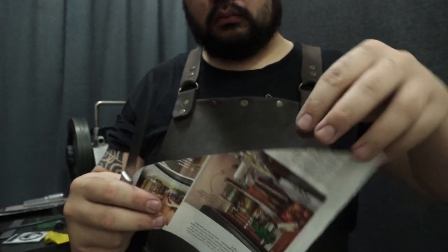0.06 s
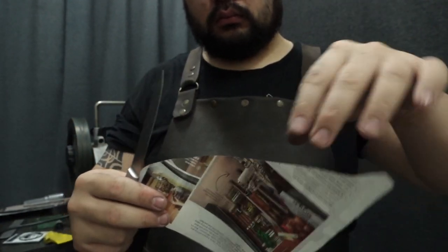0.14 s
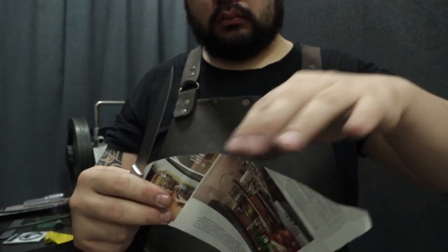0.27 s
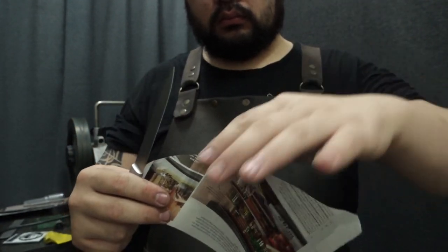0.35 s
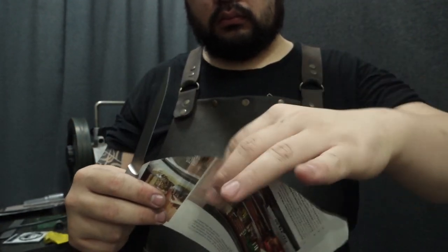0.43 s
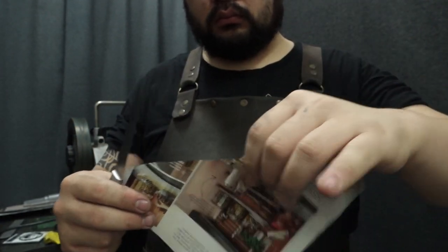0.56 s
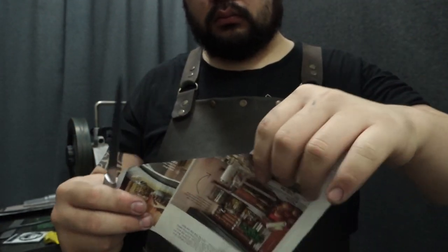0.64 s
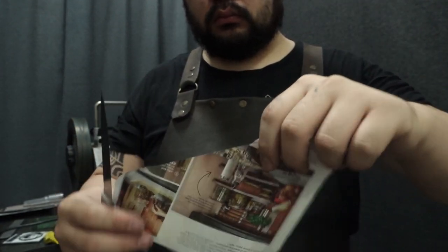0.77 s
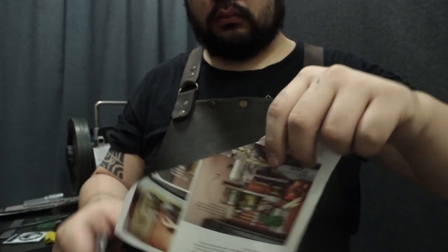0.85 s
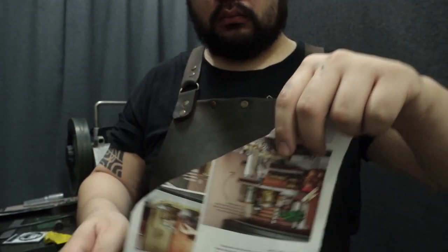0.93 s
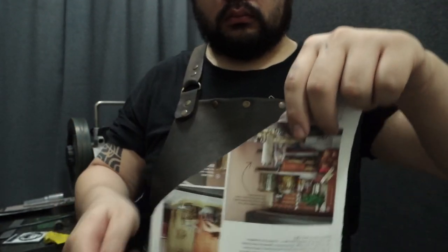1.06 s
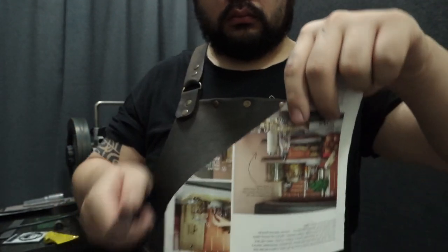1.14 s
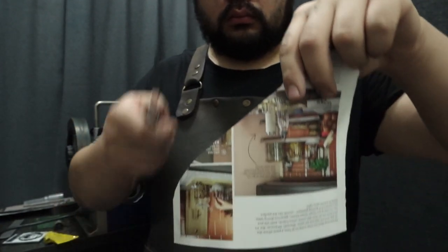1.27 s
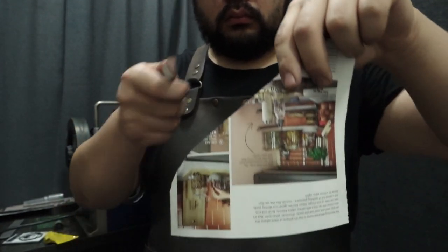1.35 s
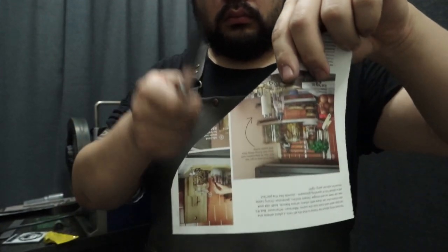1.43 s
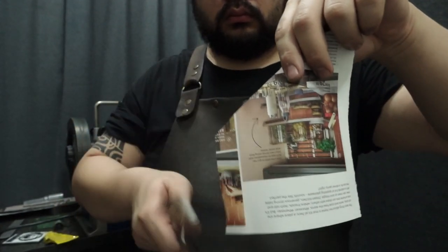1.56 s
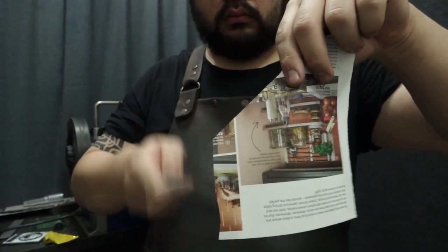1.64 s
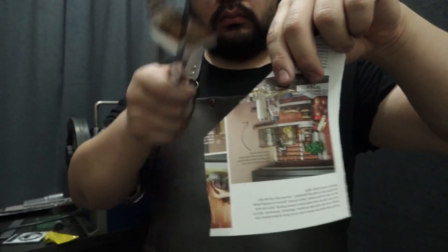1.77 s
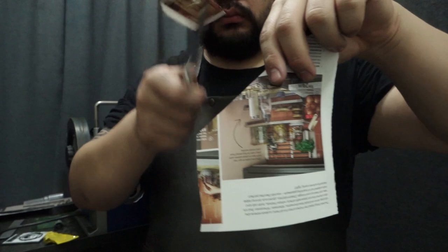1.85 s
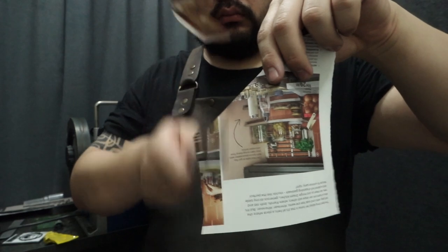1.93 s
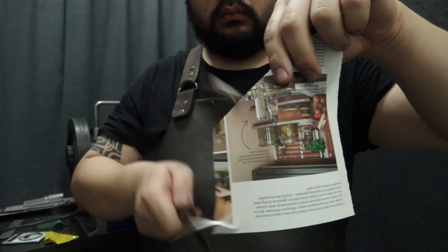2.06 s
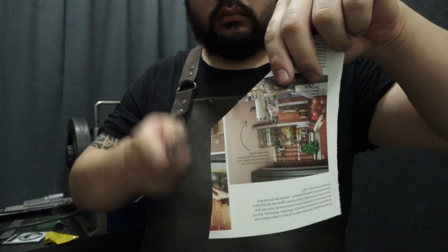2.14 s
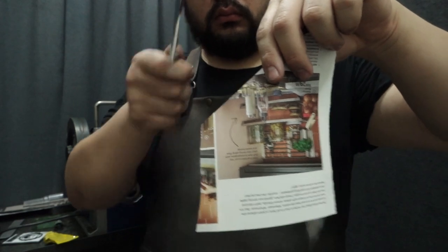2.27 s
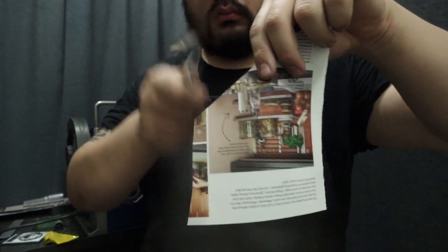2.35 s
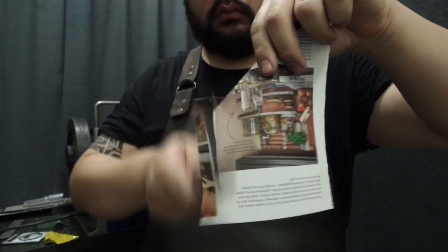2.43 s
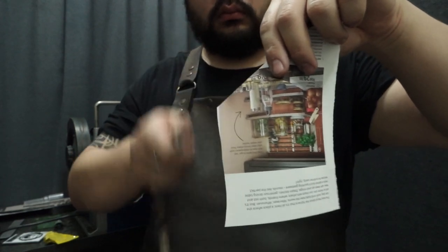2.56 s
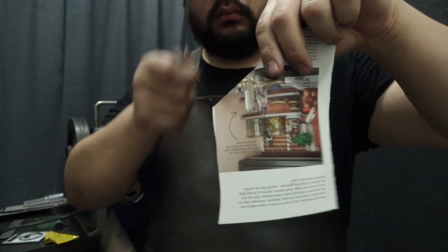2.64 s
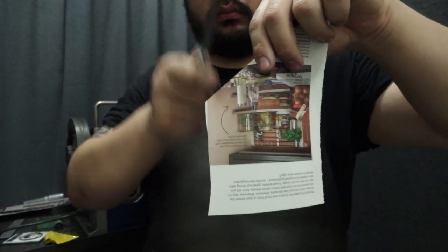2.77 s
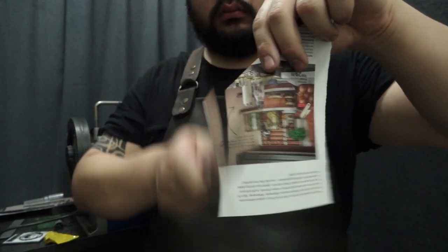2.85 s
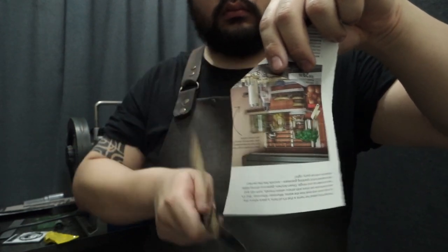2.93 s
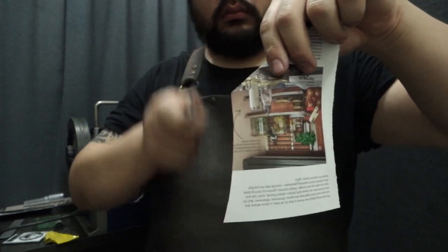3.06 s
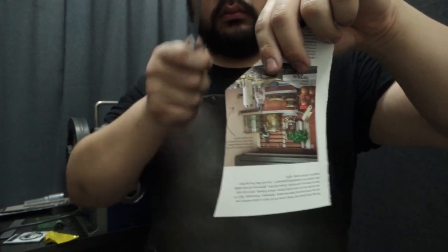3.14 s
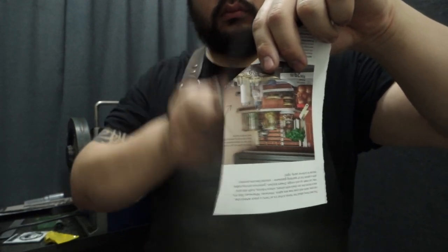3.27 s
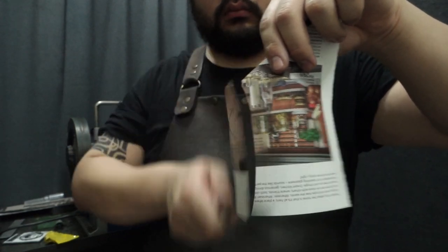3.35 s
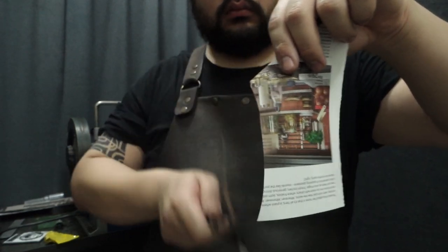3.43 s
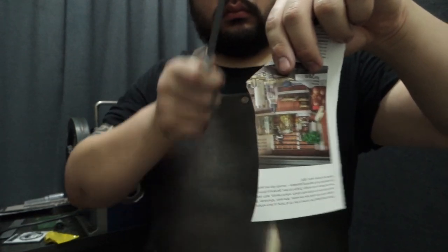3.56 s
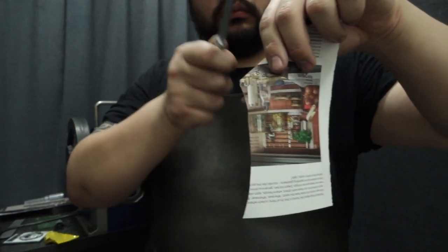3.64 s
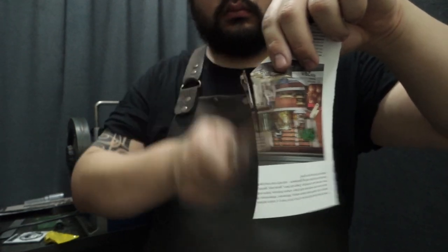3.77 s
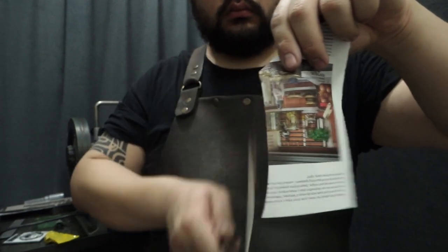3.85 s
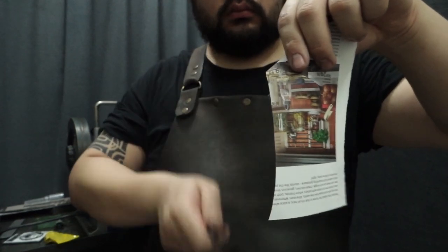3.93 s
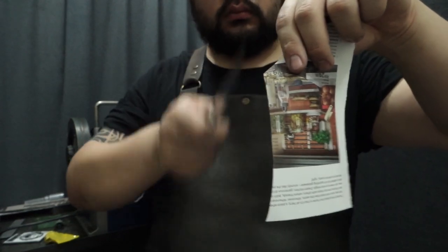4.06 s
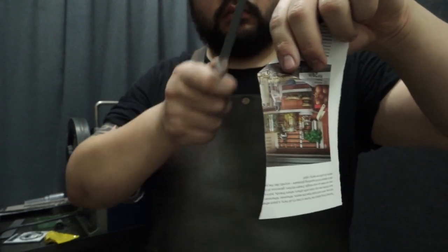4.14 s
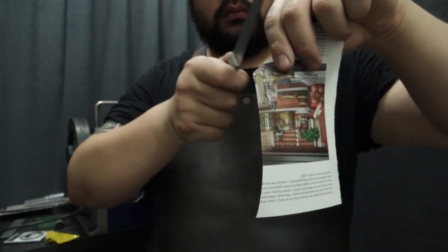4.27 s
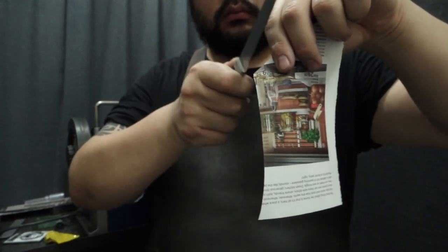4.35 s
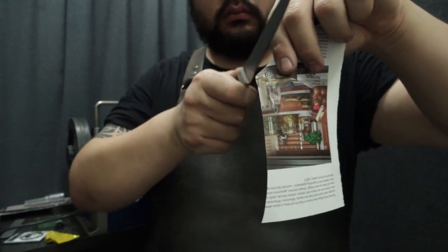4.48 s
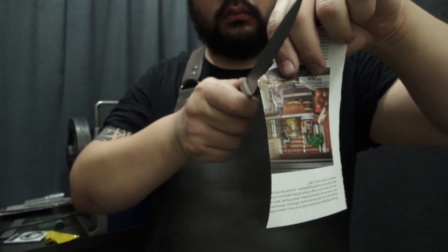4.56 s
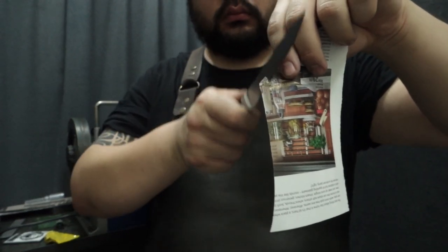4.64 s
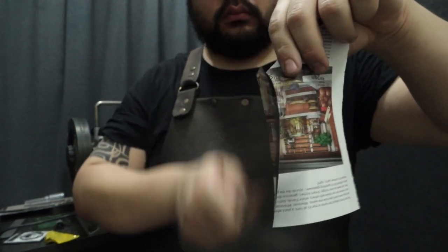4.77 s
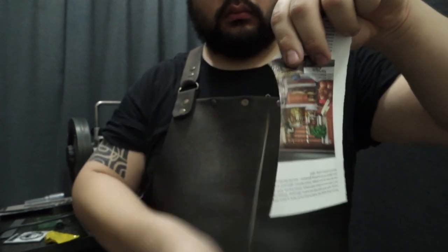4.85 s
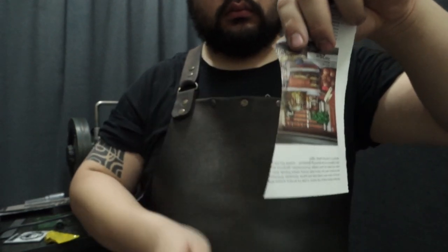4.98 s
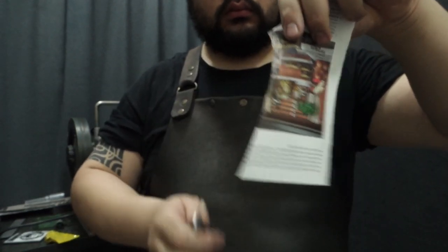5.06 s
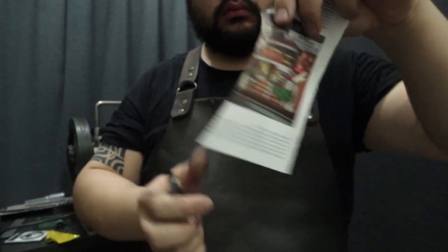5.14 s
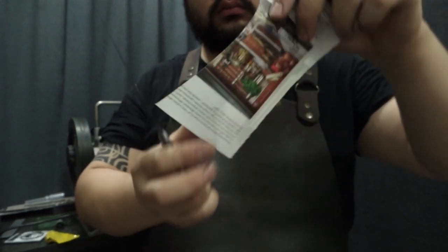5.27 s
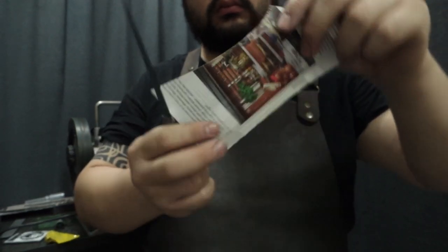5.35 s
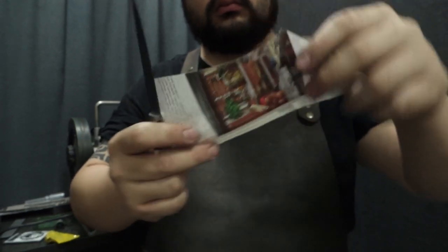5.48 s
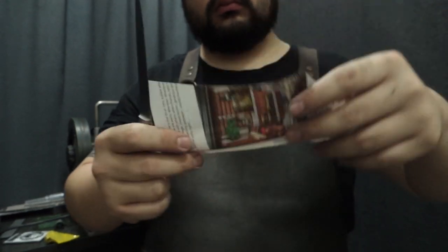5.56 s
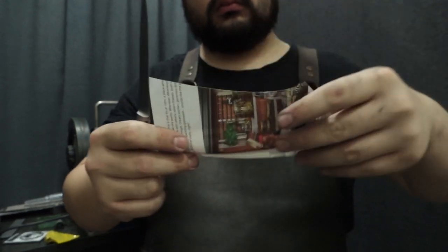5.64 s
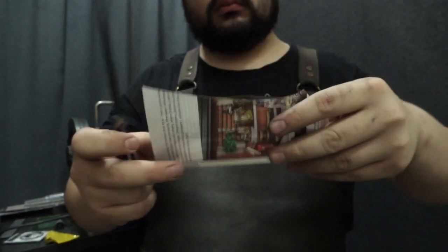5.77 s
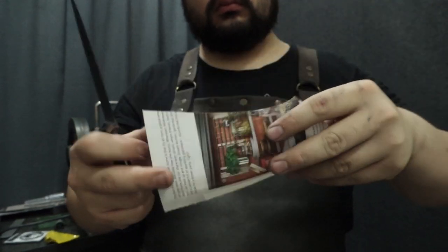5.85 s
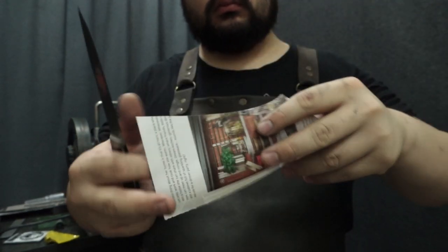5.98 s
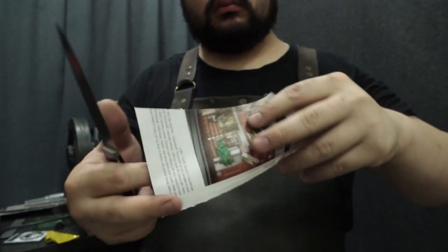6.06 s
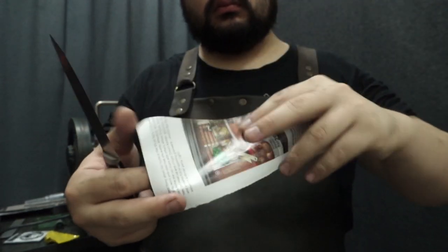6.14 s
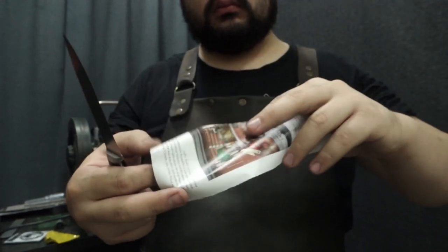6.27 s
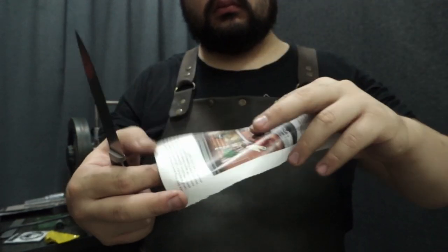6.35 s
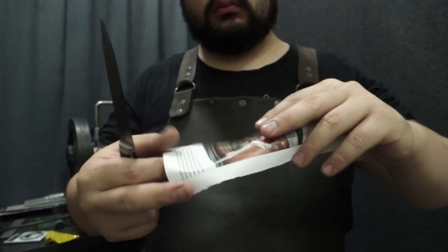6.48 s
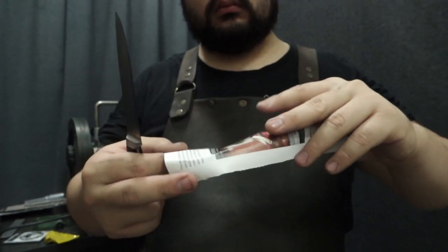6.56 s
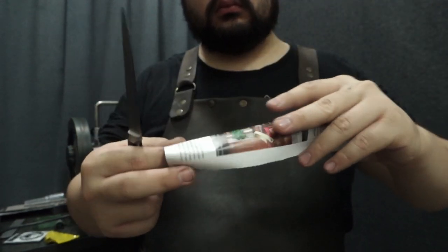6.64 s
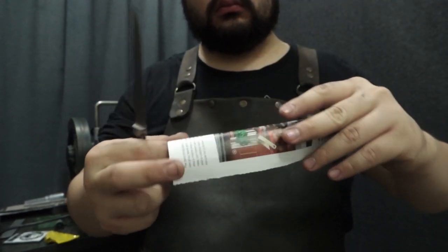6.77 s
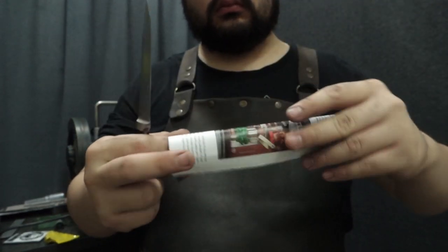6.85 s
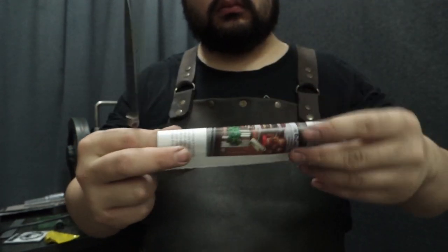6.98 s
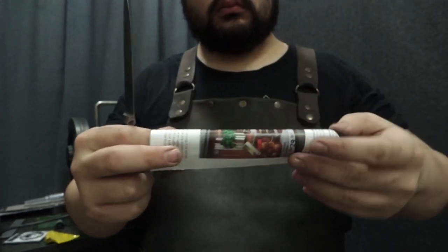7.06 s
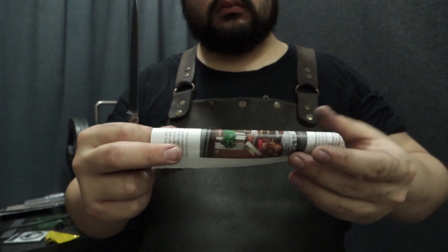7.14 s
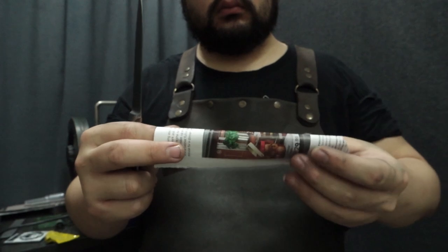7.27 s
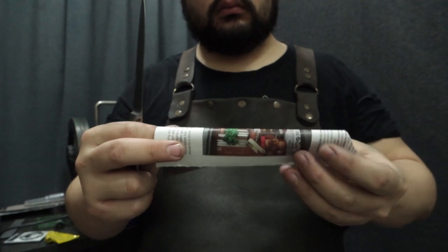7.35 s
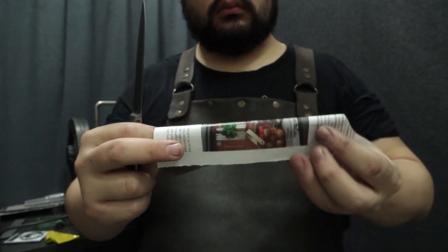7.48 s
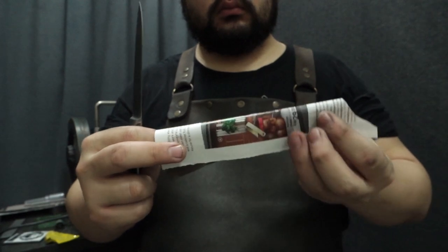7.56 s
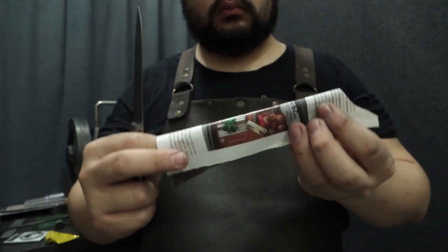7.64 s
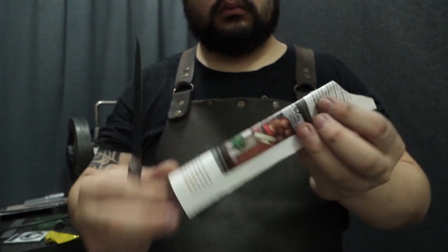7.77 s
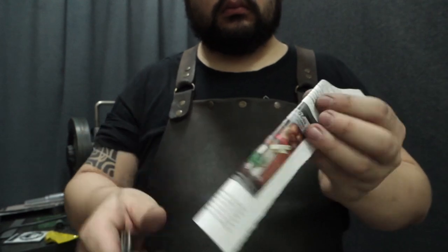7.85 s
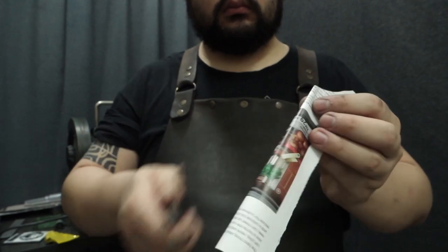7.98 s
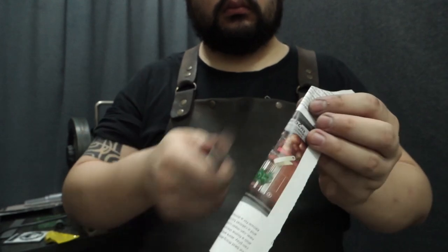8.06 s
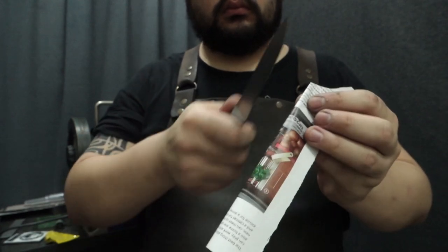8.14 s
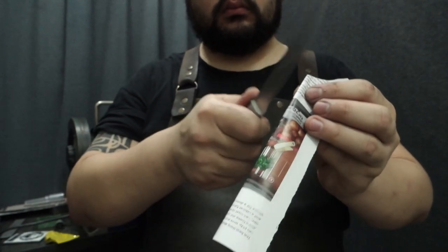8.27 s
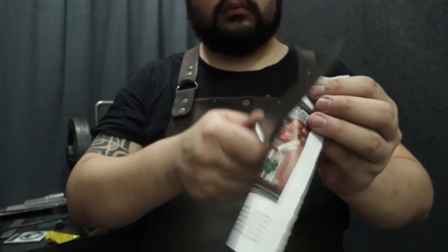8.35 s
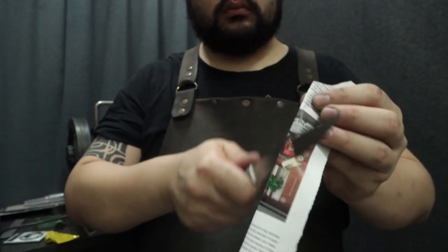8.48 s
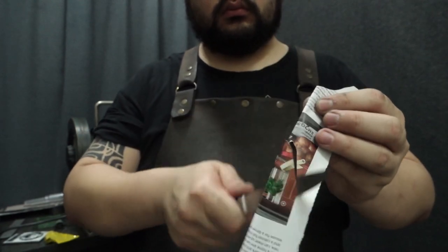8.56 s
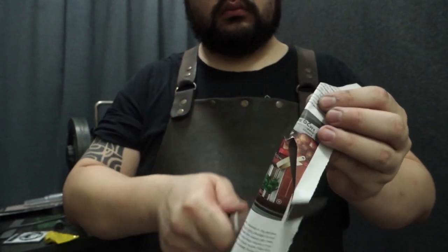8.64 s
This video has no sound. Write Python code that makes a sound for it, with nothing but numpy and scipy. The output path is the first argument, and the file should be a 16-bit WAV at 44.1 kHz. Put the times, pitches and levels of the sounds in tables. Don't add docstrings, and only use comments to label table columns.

```python
import sys
import numpy as np
from scipy import signal
from scipy.fft import rfft, irfft
from scipy.io import wavfile
from scipy.ndimage import uniform_filter1d

SR = 44100
rng = np.random.default_rng(int(sys.argv[2]) if len(sys.argv) > 2 else 0)


def elevation(decibels):
    levels = np.asarray(decibels, float)
    return 10 ** (levels / 20)


def output_pcm(signal):
    pcm = np.clip(np.atleast_2d(signal).T, -1, 1) * 32767
    wavfile.write(sys.argv[1], SR, np.round(pcm).astype(np.int16))


N = 384111


def evened(x):
    return x / np.sqrt(np.mean(x ** 2) + 1e-20)


def read(points, hz):
    f, value = np.transpose(points)
    return np.interp(np.log(hz + 1), np.log(f + 1), value)


def add(mix, s, sound):
    part = mix[..., round(s * SR):][..., :sound.shape[-1]]
    part += sound[..., :part.shape[-1]]


def sides(x, pan_db):
    return np.array([x * elevation(pan_db / 2), x * elevation(-pan_db / 2)])


def colour(x, points, lag_s=0.):
    hz = np.fft.fftfreq(4096, 1 / SR)
    log_gain = np.log(elevation(read(points, abs(hz))))
    phase = -signal.hilbert(log_gain).imag - 2 * np.pi * hz * lag_s
    impulse = np.fft.ifft(np.exp(log_gain + 1j * phase)).real[:len(hz) // 2]
    return signal.oaconvolve(x, impulse)[:len(x)]


def resonate(x, hz, width_hz):
    turn = np.exp(2j * np.pi * np.cumsum(hz) / SR)
    r = np.exp(-np.pi * width_hz / SR)
    return 2 * (turn * signal.lfilter([1 - r], [1, -r], x / turn)).real


def pair(frames, same, balance_db):
    a, b, c, d = rng.standard_normal((frames, len(same), 4)).T
    same = np.clip(same, 0, 1)[:, None]
    tilt = elevation(balance_db / 2)[:, None]
    left = a + 1j * b
    right = same * left + np.sqrt(1 - same ** 2) * (c + 1j * d)
    return np.array([left * tilt, right / tilt])


# pitch_hz, level_db (per Hz)
FAN_AIR = [(60, -48), (200, -33), (400, -21), (600, -17.5), (1000, -15.5), (1500, -17.5), (2600, -21.5),
           (3100, -30.5), (10500, -32), (11500, -35)]
# pitch_hz, width_hz, level_db
FAN_DUCTS = [
    (664.4, 48, 1),
    (1797, 39, -6),
    (2200, 60, -8),
]
# pitch_hz, likeness (-1 to 1)
FAN_LIKENESS = [(60, 0.81), (170, 0.87), (490, 0.93), (1400, 0.47), (4010, -0.031), (11400, -0.22)]
# pitch_hz, left_over_right_db
FAN_LEAN = [(60, -4.5), (220, 2.5), (830, 0), (3080, -1.5), (11400, -4.0)]


def fan():
    frames, hz = N // 256 + 5, np.fft.rfftfreq(1024, 1 / SR)
    patches = rng.standard_normal((frames, len(hz))).T
    patches = uniform_filter1d(patches, size=10, axis=0)
    patches = evened(uniform_filter1d(patches, size=12, axis=1))
    ducts = sum(elevation(db - 4) / (1 + (2 * (hz - f) / width) ** 2) for f, width, db in FAN_DUCTS)
    gain = (elevation(read(FAN_AIR, hz)) + ducts)[:, None] * elevation(1.8 * patches)
    z = pair(frames, read(FAN_LIKENESS, hz), read(FAN_LEAN, hz)) * gain
    noise = signal.istft(z, nperseg=1024, noverlap=768)[1][:, :N]
    return elevation(-56) * evened(noise)


# start_s, length_s, from_hz, to_hz, level_db
BIRD_WHISTLES = [(0, .08, 10250, 9950, -65), (.09, .1, 9950, 9850, -69), (.055, .125, 10650, 10700, -70),
                 (.2, .08, 11050, 9300, -66), (2.69, .07, 10400, 10400, -66),
                 (2.76, .07, 10500, 10100, -64), (3.08, .09, 10500, 9550, -67),
                 (3.13, .07, 11300, 10550, -63), (5.6, .05, 10700, 10950, -63),
                 (5.645, .085, 10350, 10100, -68), (5.87, .1, 10700, 10750, -66),
                 (8.163, .04, 9900, 10500, -64), (8.22, .11, 10400, 11000, -64),
                 (8.33, .02, 11000, 10100, -62)]


def birds():
    out = np.zeros(N)
    for s, length_s, from_hz, to_hz, top_db in BIRD_WHISTLES:
        t = s + np.arange(0, length_s, 1 / SR)
        u = (t - s) / length_s
        hz = from_hz + (to_hz - from_hz) * u ** 1.5
        level_db = top_db - 5 * (1 - np.sin(np.pi * u))
        flutter_db = 3.3 * evened(uniform_filter1d(rng.standard_normal(SR // 4), size=600))[:len(t)]
        glide = np.cumsum(uniform_filter1d(hz, size=400)) / SR
        whistle = np.sin(2 * np.pi * glide) * signal.windows.tukey(len(t), .2)
        add(out, t[0], np.sqrt(2) * elevation(level_db + flutter_db) * whistle)
    return sides(out * elevation(-5), -3)


# pitch_hz, t60_s
ROOM_DECAY = [(200, 0.42), (1000, 0.27), (2500, 0.31), (6000, 0.29), (11000, 0.2)]
# pitch_hz, likeness (0 to 1)
ROOM_LIKENESS = [(300, 0.68), (2000, 0.79), (3500, 0.43), (6000, 0.1)]


def room(x):
    hz, t = np.fft.rfftfreq(256, 1 / SR), np.arange(400) * 64 / SR
    lean_db = read([(2000, -1.0), (9000, -7.5)], hz)
    tone_db = read([(1000, 0.000066), (2500, -0.26), (8000, 0.38)], hz)[:, None]
    fall_db = 60 * t / read(ROOM_DECAY, hz)[:, None]
    z = pair(len(t), read(ROOM_LIKENESS, hz), lean_db) * elevation(tone_db - fall_db)
    tail = signal.istft(z, nperseg=256, noverlap=192)[1]
    tail = tail * np.clip(np.arange(tail.shape[1]) / SR / 0.0054 - .4, 0, 1)
    return signal.fftconvolve(x[None], tail / np.linalg.norm(tail[1]), axes=1)[:, :N]


def fibres(count, per_s, spread_db, clump_db, clump_s):
    chance, size = rng.random(count), rng.exponential(1, count)
    sign, clump = rng.standard_normal(count), rng.standard_normal(count)
    clump = evened(uniform_filter1d(clump, max(int(clump_s * SR), 1)))
    level_db = spread_db * np.minimum(size, 3) + clump_db * clump
    return evened((chance < per_s / SR) * sign * elevation(level_db))


# peak_s, rise_s, fade_s, sheet_db, fizz_db
FLUTTER_RUBS = [(1.628, .03, .15, -46, -43), (1.715, .05, .06, -35, -40), (2.089, .03, .07, -42, -59),
                (2.545, .02, .08, -44, -50), (2.574, .02, .06, -58, -41), (3.002, .004, .04, -23, -45),
                (3.025, .03, .055, -36, -41), (3.448, .03, .15, -49, -55), (3.492, .05, .065, -52, -43.5),
                (3.869, .01, .05, -34, -42), (3.9, .03, .15, -47, -52), (4.472, .003, .07, -48, -54),
                (4.576, .004, .1, -51, -50.5), (4.608, .06, .01, -40, -41)]
TURNING_RUBS = [(0.001, .01, .16, -53, -57), (.451, .02, .14, -52, -62), (.54, .02, .2, -43, -62),
                (.585, .07, .22, -44, -52), (.72, .1, .2, -51, -60), (.815, .2, .06, -48, -55.5),
                (.894, .04, .16, -57, -56.5), (5.24, .06, .06, -61, -56), (5.348, .035, .03, -47, -37),
                (5.378, .02, .22, -46, -48), (5.458, .02, .15, -44, -58), (5.456, .004, .03, -38, -34),
                (5.53, .1, .15, -54, -52), (5.739, .11, .04, -52, -51), (5.775, .03, .15, -54, -66)]
ROLLING_RUBS = [(5.994, .015, .055, -24.5, -41), (6.1, .1, .1, -57, -56), (6.15, .07, .15, -39, -50),
                (6.34, .2, .08, -43, -47), (6.427, .03, .2, -53, -55), (6.509, .1, .12, -45.5, -47.5),
                (6.655, .015, .02, -34, -43), (6.769, .03, .06, -38, -56), (6.87, .025, .12, -43, -51),
                (6.962, .07, .05, -38, -57.5), (7.034, .12, .11, -45.5, -50.5), (7.309, .08, .4, -51, -64),
                (7.477, .04, .05, -44, -50.5), (7.62, .1, .15, -55, -74), (7.76, .16, .15, -46, -50),
                (7.82, .05, .13, -51, -59)]


def rustle():
    rubs = FLUTTER_RUBS + TURNING_RUBS + ROLLING_RUBS
    t = np.arange(0, N / SR + .002, .001)
    s, rise, fade, sheet_db, fizz_db = np.transpose(rubs)[..., None]
    shape_db = -20 * np.maximum((s - t) / abs(rise), (t - s) / abs(fade))

    def envelope(db):
        power = (elevation(db + shape_db) ** 2).sum(axis=0)
        return np.interp(np.arange(N) / SR, t, np.sqrt(power))

    crackle = fibres(N, per_s=3500, spread_db=0.5, clump_db=-1.5, clump_s=.006)
    ring = evened(crackle + .7 * resonate(crackle, np.full(N, 2700.), 1100))
    hiss = evened(crackle + .6 * resonate(crackle, np.full(N, 7000.), 1800))
    sheet = ring * envelope(sheet_db) * elevation(-3.5)
    fizz = hiss * envelope(fizz_db) * elevation(-3.5)
    return 0, sheet, sides(fizz, 1.2)


def snap(s, peak_db, ring_hz, fizz_db, held_db=0):
    t = np.arange(2048) / SR
    length_s = .008 - .0001 * fizz_db - .0003 * (peak_db + 15)
    hollow = max(1900 / ring_hz, 1) ** 2
    thud_db = -54 + .5 * (peak_db + 30) - .15 * (fizz_db + 15)
    burst = elevation(-24 * (t / max(length_s, .001)) ** 1.39)
    crack = rfft((rng.standard_normal(len(t)) + 4.1 * (t == 0)) * burst)
    crack = irfft(crack / np.sqrt(abs(crack)))
    crack = evened(crack * np.sqrt(burst)) * np.sqrt(np.mean(burst ** 2))
    body = resonate(crack, np.full(len(t), ring_hz), 706 / hollow ** .5)
    ring = (crack + hollow * 2.64 * body) / hollow ** .5
    push = elevation(held_db) * rng.standard_normal(len(t)) * elevation(-60 * t / 0.058)
    fizz = sides(crack * elevation(peak_db + fizz_db - 2.0), -1.5)
    return s + .0022, 0.37 * ring * elevation(peak_db), fizz, push * elevation(thud_db)


# start_s, peak_db, ring_hz, fizz_over_sheet_db
TURNING_SNAPS = [(0.444, -54, 1780, -10), (0.5297, -29, 2490, -24.5), (0.567, -31, 1950, -34),
                 (0.5837, -30.5, 1370, -32), (0.6619, -32.5, 2250, -10.5), (0.824, -33, 1330, -31),
                 (0.8883, -33, 2200, -25), (1.65, -30.5, 2200, -5), (1.682, -27, 2620, -29),
                 (2.1066, -33.5, 1820, -31), (2.5654, -44, 1920, 9), (2.995, -15, 2750, -1.5),
                 (3.0, -17, 1930, -30), (4.571, -43.5, 1930, -10.5), (4.614, -31, 1300, 3),
                 (5.319, -40, 2200, -7), (5.3742, -26, 1280, -34), (5.45, -25, 2670, 2.5),
                 (5.586, -37, 1420, -25), (5.752, -28.5, 1050, -31)]
ROLLING_SNAPS = [(5.9765, -30, 1760, 0), (5.9849, -18.5, 1780, -6.5), (5.9887, -16.5, 1690, -15),
                 (6.114, -35.5, 1780, -14), (6.1367, -20, 1920, -17), (6.27, -35, 2220, -25),
                 (6.3298, -20.5, 2370, -12), (6.418, -32, 2160, -10.5), (6.43, -32.5, 2150, -20),
                 (6.565, -41.5, 1860, -1), (6.6571, -11.5, 2900, -4), (6.6776, -16.5, 2950, -1.5),
                 (6.863, -36, 2960, -15), (6.9223, -31.5, 2060, -13), (6.95, -30.5, 2670, -39),
                 (7.0724, -34.5, 1250, -33), (7.173, -44.5, 1300, -28), (7.236, -44.5, 2100, -16),
                 (7.292, -42, 1780, -20), (7.359, -37.5, 2500, -34), (7.662, -36.5, 2400, -14.5),
                 (7.6987, -25.5, 2540, -41), (7.742, -34.5, 2510, -10), (7.804, -30, 2530, -16),
                 (8.3545, -30, 1650, -8), (8.3795, -25, 2580, -10), (8.4105, -13, 2290, -16),
                 (8.7034, -19, 2540, -5)]


def buckles():
    return [snap(*e) for e in TURNING_SNAPS] + [snap(*e, held_db=3) for e in ROLLING_SNAPS]


def cut(t, sheet_db, fizz_db, ring_hz, fizz_hz, pan_db, flap_db):
    tear = fibres(SR // 2, per_s=12000, spread_db=1.5, clump_db=0.6, clump_s=.003)[:len(t)]
    edge = np.clip(np.minimum(t - t[0], t[-1] - t) / 0.0015, 0, 1)
    flap = elevation(flap_db + 14) * resonate(resonate(tear, ring_hz / 2, 660), ring_hz / 2, 670)
    ring = evened(tear + 3.4 * resonate(tear, ring_hz, 950))
    sheet = (ring + flap) * elevation(sheet_db) * edge
    fizz = evened(tear + 0.57 * resonate(tear, fizz_hz, 1800)) * elevation(sheet_db + fizz_db) * edge
    return t[0], sheet, sides(fizz, pan_db - 1.5)


def blade(t, sheet_db, fizz_db, pan_db, hang_db, raised_hz):
    u = (t - t[0]) / (t[-1] - t[0])
    bend = uniform_filter1d(rng.standard_normal((SR // 2, 2)), int(.025 * SR), axis=0)
    stray = 1 + .07 * evened(bend)[:len(t)].T
    ring_hz = (raised_hz + 2080 + (2620 - 2080) * u) * stray[0]
    fizz_hz = (9500 + (7400 - 9500) * np.sin(np.pi * u)) * stray[1]
    flap_db = hang_db + (max(-13, hang_db) - hang_db) * np.exp(-(t - t[0]) / .012)
    travel_db = -2 + (-5 + 2) * u
    return cut(t, sheet_db, fizz_db, ring_hz, fizz_hz, pan_db + travel_db, flap_db)


# time_s, sheet_db
HAND_PRESSURES = [
    [(4.612, -37), (4.673, -33), (4.704, -26), (4.75, -24.5), (4.8, -24), (4.827, -28)],
    [(6.68, -31), (6.7, -28.5), (6.73, -34), (6.77, -50)],
    [(8.357, -38), (8.407, -30), (8.5, -24), (8.559, -27), (8.63, -24), (8.71, -25.5)],
]
# fizz_over_sheet_db, flap_over_sheet_db, ring_raised_hz
SLOW_SOUNDS = [
    (-3, -6.5, -220),
    (-8, -28, 500),
    (-9, -23, 170),
]


def slow_drags():
    cuts = []
    for pressure, (fizz_db, flap_db, raised_hz) in zip(HAND_PRESSURES, SLOW_SOUNDS):
        s, db = np.transpose(pressure)
        t = np.arange(s[0], s[-1], 1 / SR)
        sheet_db = np.interp(t, s, db)
        gain_db = 6.5 * ((t - t[0]) / (t[-1] - t[0])) ** 3
        follow_db = (1 - .9) * (sheet_db - sheet_db.max())
        cuts.append(blade(t, sheet_db, fizz_db + gain_db - follow_db, -4, flap_db, raised_hz))
    return cuts


# start_s, length_s, sheet_db (at fullest), fizz_db, bite_db (entering edge)
QUICK_STROKES = [
    (1.495, .058, -24, -27.5, -25),
    (1.946, .08, -28.5, -26, -21),
    (2.405, .073, -27, -27, -18),
    (2.846, .082, -28, -25, -24),
    (3.289, .084, -26.5, -26, -15),
    (3.763, .094, -27.5, -26, -27),
]


def quick_strokes():
    cuts, bites = [], []
    for s, length_s, full_db, fizz_db, bite_db in QUICK_STROKES:
        t = s + np.arange(0, length_s, 1 / SR)
        swell_db = np.interp(t - s, [0, .7 * length_s, length_s], [-9, 0, -3])
        fizz_over_sheet_db = fizz_db - full_db - (1 - .15) * swell_db
        hang_db = -44 + 6.5 * s
        cuts.append(blade(t, full_db + swell_db, fizz_over_sheet_db, 0, hang_db, 0))
        bites.append(snap(s - .003, bite_db, 1920, -10, held_db=-8))
    return cuts, bites


def bending(x, patch_db):
    z = signal.stft(x, nperseg=256, noverlap=192)[2]
    field = rng.standard_normal((z.shape[-1], z.shape[-2], 3)).T
    field = uniform_filter1d(field, size=3, axis=1)
    field = evened(uniform_filter1d(field, size=8, axis=2))
    z = z * elevation(patch_db * (field[0] + .5 * field[1:]))
    return signal.istft(z, nperseg=256, noverlap=192)[1][..., :N]


def drives(parts):
    out = np.zeros((3, 2, N))
    for s, *layers in parts:
        for drive, layer in zip(out, layers):
            add(drive, s, layer)
    return out


# pitch_hz, level_db
SHEET_TONE = [(60, -70.5), (220, -38), (420, -16.5), (850, -16), (1100, -11.5), (1900, -6), (3300, -8),
              (4500, -15.5), (6500, -39)]
# pitch_hz, level_db
FIZZ_TONE = [(3000, -32), (4900, -7), (5800, -2), (8500, -1.5), (11500, 2)]
# pitch_hz, level_db
THUD_TONE = [(30, -12), (120, -19), (350, 0), (600, 3), (1200, -24)]
# pitch_hz, level_db
LEFT_SHADE = [(100, -2.5), (2700, -2), (3500, -3), (4400, -20.5), (5500, 3), (7500, 3), (9600, -3.5),
              (11500, -4)]


def paper():
    cuts, bites = quick_strokes()
    sheet, fizz, thud = drives(bites + buckles())
    torn, fizzed = bending(drives(cuts + slow_drags() + [rustle()])[:2], patch_db=2.6)
    ports = []
    for a, b, c in zip(sheet + torn, fizz + fizzed, thud):
        flexing = elevation(12.5) * colour(a, SHEET_TONE)
        tearing = elevation(4.5) * colour(b, FIZZ_TONE)
        pushing = elevation(16.5) * colour(c, THUD_TONE)
        ports.append(flexing + tearing + pushing)
    left, right = ports
    return np.array([colour(left, LEFT_SHADE, lag_s=1.5e-5), right]), (left + right) / 2


def scene():
    direct, feed = paper()
    return elevation(-1) * direct + elevation(-4.5) * room(feed) + fan() + birds()


def low_pass(x):
    return signal.sosfilt(signal.butter(12, 12050, fs=SR, output="sos"), x)


def record(dry):
    thinned = signal.sosfilt(signal.butter(3, 85, "high", fs=SR, output="sos"), dry)
    band_limit = signal.firwin(1501, 11130, window=("kaiser", 7), fs=SR)
    limited = signal.oaconvolve(thinned, band_limit[None], "same")
    return low_pass(limited)


dry = scene()
out = record(dry)
output_pcm(out)
```